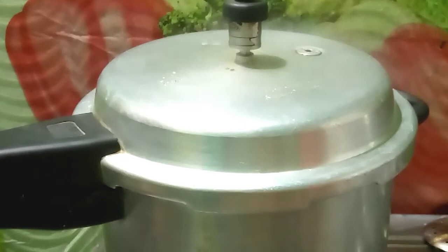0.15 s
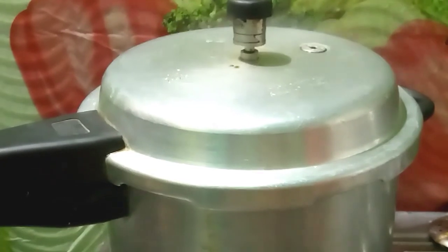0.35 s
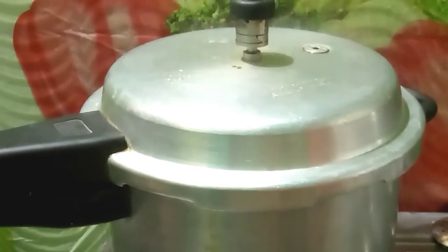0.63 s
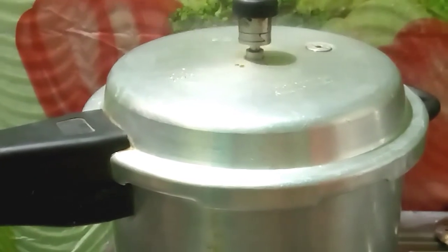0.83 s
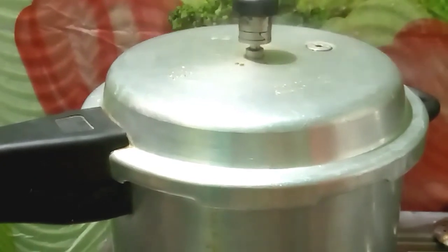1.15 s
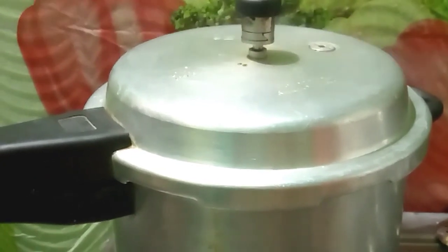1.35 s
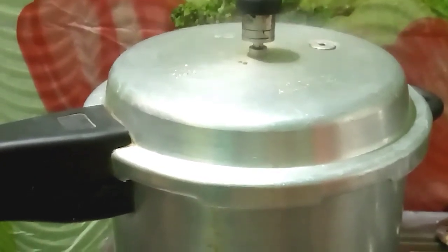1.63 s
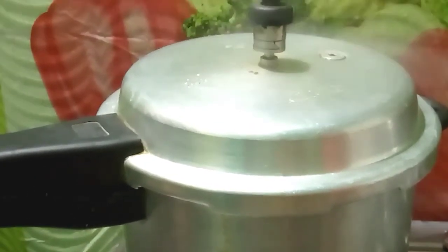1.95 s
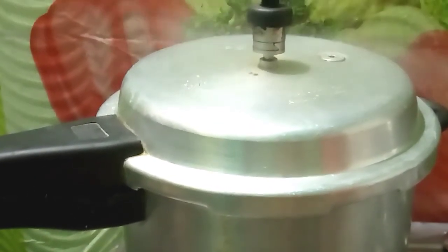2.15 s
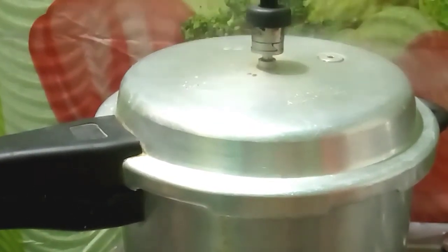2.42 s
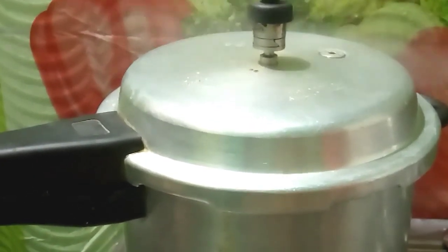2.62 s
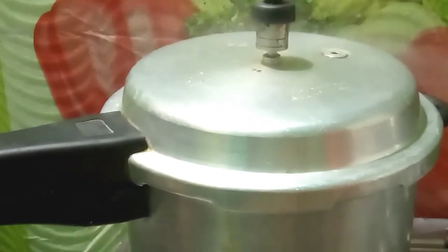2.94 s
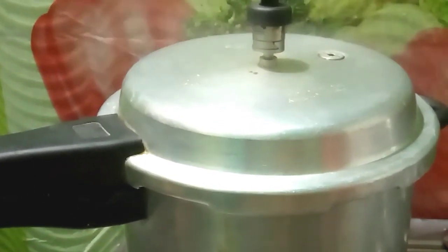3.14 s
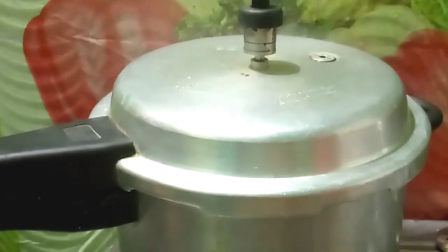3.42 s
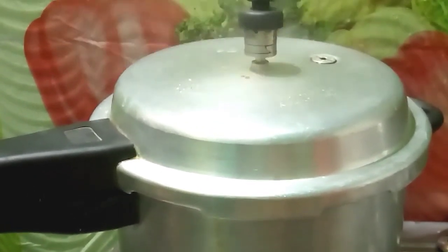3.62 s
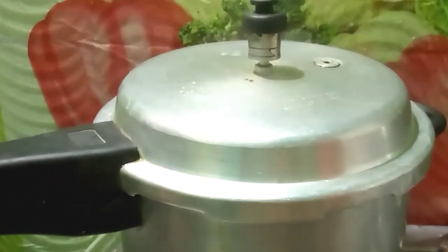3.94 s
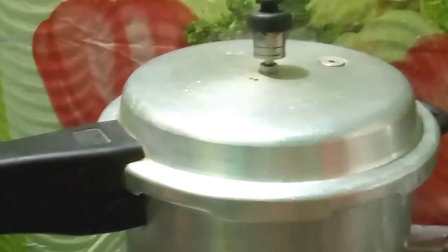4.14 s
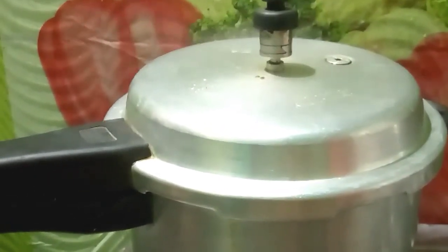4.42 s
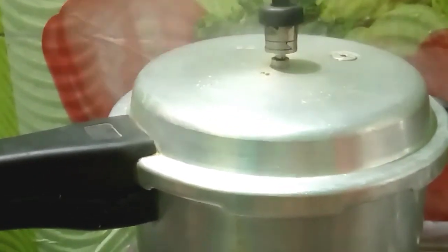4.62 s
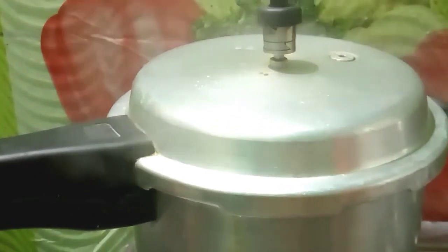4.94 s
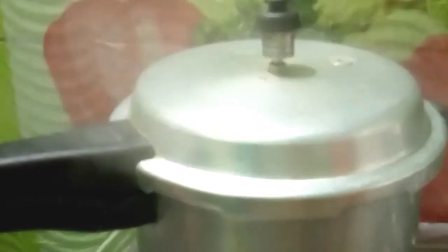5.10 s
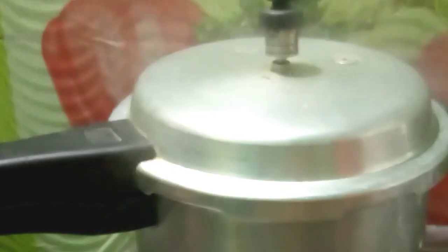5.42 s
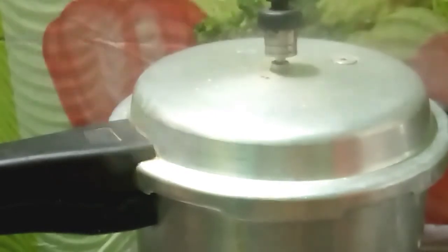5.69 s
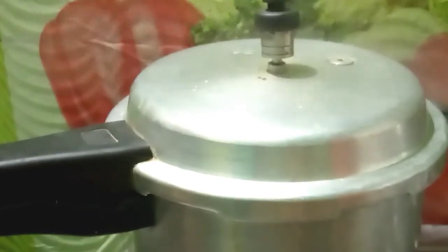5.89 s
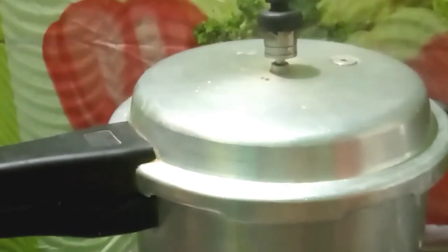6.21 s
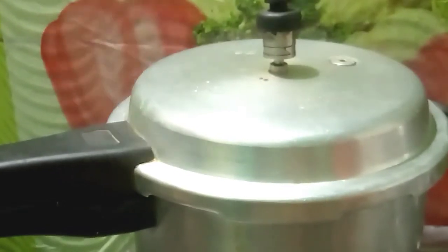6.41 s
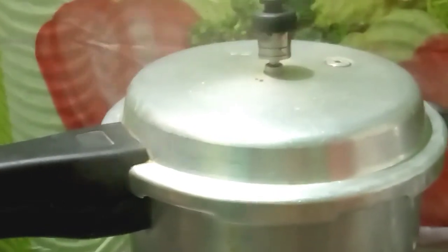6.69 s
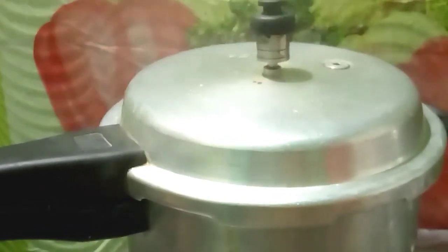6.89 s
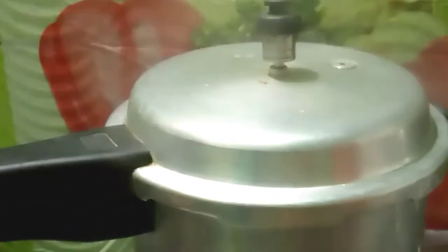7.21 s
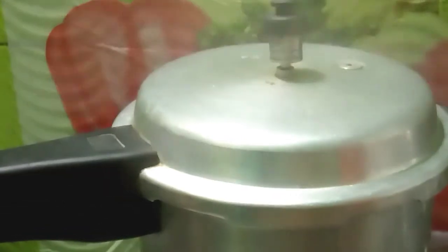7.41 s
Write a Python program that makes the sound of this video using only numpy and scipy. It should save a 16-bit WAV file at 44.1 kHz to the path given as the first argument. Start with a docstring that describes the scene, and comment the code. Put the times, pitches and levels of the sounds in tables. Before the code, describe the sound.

A metal pressure cooker vents steam past its weight valve in a kitchen, heard close. The loud, dense, bright hiss is already at full force at the start. Before one second it cuts to silence for about a tenth of a second, then returns abruptly. It holds steady with tiny flutters, its colour shifting slightly, then fades evenly over the last moments. Same sound in both channels, nothing else heard.

```python
"""A broad hiss close by: a pressure cooker vents steam past its weight valve in a kitchen.
Jet turbulence is shaped noise, coloured by the modes of the short vent pipe and combed by lid and walls.
The level flutters; the colour starts fresh, settles, and drifts over some seconds.
The sound drops out for about a tenth of a second early on and fades at the end."""
import sys
import numpy as np
from scipy import signal
from scipy.fft import rfft, irfft
from scipy.io import wavfile
from scipy.ndimage import uniform_filter1d

SR = 44100
rng = np.random.default_rng(int(sys.argv[2]) if len(sys.argv) > 2 else 0)


def digitize_waveform(pressure):
    """Quantize a signal to 16-bit integers and store it at the path in sys.argv[1].

    Rows of a 2-D input are taken as channels; values are limited to [-1, 1].
    """
    field = np.atleast_2d(pressure).T
    bounded = np.clip(field, -1, 1)
    quanta = np.round(bounded * 32767).astype(np.int16)
    wavfile.write(sys.argv[1], SR, quanta)


def makeup_ratio(level_db):
    """Linear amplitude ratio for a level in decibels (20 dB per factor of ten)."""
    decades = np.asarray(level_db, float) / 20
    return 10 ** decades


N = 332936

# jet turbulence spectrum once settled: (frequency [Hz], relative density [dB])
TURBULENCE = [(25, -32.5), (150, -30.5), (600, -29), (1500, -29.5), (2200, -25), (4700, -35), (5200, -13.5),
              (7900, -24), (9000, -21.5), (12000, -23.5), (13800, -26), (15700, -25)]
# vent pipe modes once settled: (centre [Hz], width scale [Hz], early peak [dB], late peak [dB])
PIPE_MODES = [(3558, 1495, -13, -14.6), (6620, 776, -3.5, -6), (10830, 600, -22.0, -25),
              (14790, 500, -22.5, -28.5)]
# peaks and dips from close reflections: (centre [Hz], width of two sigma [Hz], early gain [dB], late gain [dB])
REFLECTIONS = [(1143, 93, 3.5, 4), (1820, 80, -3, -2), (2416, 90, 2.2, 3.5), (2820, 156, 3.5, 3.5),
               (3190, 120, 1.8, -3), (3360, 220, 3, 0.6), (3580, 150, 2, -0.3), (3810, 50, 3.5, 2.5),
               (3946, 175, -2.5, -5), (4100, 80, 2.5, 1.1), (4330, 210, -1, -3), (5110, 190, -3.8, -3),
               (5280, 250, -1.5, -0.5), (5610, 60, -0.5, 3.6), (5910, 220, 0.6, 2.8), (6220, 140, 0.5, 5),
               (6480, 99, -4.5, -1.2), (6640, 122, 2.5, 4.5), (6810, 63, -3, -2.6), (6830, 220, -1.5, 1.9),
               (7050, 100, 2, -0.5), (7180, 130, 1.2, 4.5), (7460, 73, 3, 1.5), (7420, 70, -4, 1),
               (7700, 180, 2, 3), (7900, 200, -1, 0), (10130, 180, 2, 3.4), (10470, 150, 1, 3),
               (11700, 400, -1, -2), (12250, 400, 2, 0), (12750, 300, -1, 2), (13530, 110, -1, -0.5),
               (14510, 220, 1, 2.6)]

DRIFT_START_S, DRIFT_END_S = 1.4, 5.3  # colour moves from early to late
DROPOUT_START_S, DROPOUT_END_S = .7302, .8463
FADE_START_S, FADE_END_S = 6.06, 7.75
JET_DB = -14.0  # rms before flutter and squashing
SETTLE_MID_S, SETTLE_SCALE_S = 1.8, .3  # logistic fall of freshness
FRESH_RISE, FRESH_NARROWING = 0.049, 0.11  # lowest pipe mode, as shares of its centre and width
FRESH_TOP_DB = 3.5  # extra on the top pipe mode
FRESH_RUSH_DB, RUSH_HZ = 3, 800  # extra low rush and its corner
HOP, SIZE = 1024, 4096  # samples per spectrum step and window
EDGE_HZ = 15730  # top of the passband


def freshness(t_s):
    """The new jet settles: 1 while fresh, 0 once settled."""
    return 1 / (1 + np.exp((t_s - SETTLE_MID_S) / SETTLE_SCALE_S))


def turbulence_power(t_s, hz):
    """Broadband jet noise power, with a stronger low rush while fresh."""
    table_hz, table_db = np.transpose(TURBULENCE)
    settled_db = np.interp(np.log(hz + 1), np.log(table_hz), table_db)
    low = 1 / (1 + (hz / RUSH_HZ) ** 2)
    rush_db = FRESH_RUSH_DB * np.outer(low, freshness(t_s))
    return makeup_ratio(2 * (settled_db[:, None] + rush_db))


def pipe_power(t_s, hz, late):
    """Vent pipe resonances add power; fresh, the lowest is higher and narrower, the top one louder."""
    fresh = freshness(t_s)
    extra_db = [0, 0, 0, FRESH_TOP_DB * fresh]
    glides = [1 + FRESH_RISE * fresh, 1, 1, 1]
    spans = [1 - FRESH_NARROWING * fresh, 1, 1, 1]
    power = 0
    for (mode_hz, width_hz, early_db, late_db), extra, glide, span in zip(PIPE_MODES, extra_db, glides, spans):
        offset = (hz[:, None] - mode_hz * glide) / (width_hz * span)
        peak_db = early_db + (late_db - early_db) * late + extra
        power = power + (1 + offset ** 2) ** -2.5 * makeup_ratio(2 * peak_db)
    return power


def reflection_comb_db(hz, late):
    """Close reflections raise and lower narrow bands, drifting from early to late gains."""
    comb_db = 0
    for centre_hz, width_hz, early_db, late_db in REFLECTIONS:
        bump = np.exp(-.5 * (2 * (hz - centre_hz) / width_hz) ** 2)
        comb_db = comb_db + np.outer(bump, early_db + (late_db - early_db) * late)
    return comb_db


def colour_db(t_s, hz):
    """Turbulence and pipe powers add; the reflections then filter their sum."""
    late = np.clip((t_s - DRIFT_START_S) / (DRIFT_END_S - DRIFT_START_S), 0, 1)
    power = turbulence_power(t_s, hz) + pipe_power(t_s, hz, late)
    return 10 * np.log10(power) + reflection_comb_db(hz, late)


def evened(x):
    """Scales to rms 1."""
    return x / np.sqrt(np.mean(x ** 2) + 1e-20)


def smoothed(grain, bins, frames):
    """Random texture averaged over frequency bins, then time frames; rms 1."""
    over_hz = uniform_filter1d(grain, size=bins, axis=0)
    return evened(uniform_filter1d(over_hz, size=frames, axis=1))


def wander(fastest_hz, slowest_hz):
    """Random drift as noise between two soft corner rates, rms 1."""
    hz = np.fft.rfftfreq(N, 1 / SR)
    band = hz / (hz + slowest_hz) / (1 + (hz / fastest_hz) ** 2)
    return evened(irfft(rfft(rng.standard_normal(N)) * band, N))


def flutter_db():
    """The weight dances on the vent: fast and slow random level changes."""
    return 0.36 * wander(150, 15) + 0.42 * wander(12, 1.9)


def steam():
    """Jet hiss: random complex spectra in the jet's colour, overlap-added, then fluttered."""
    t_s = np.arange(N // HOP + 5) * HOP / SR
    hz = np.fft.rfftfreq(SIZE, 1 / SR)
    real, imag, patch_grain, echo_grain = rng.standard_normal((len(t_s), len(hz), 4)).T
    patches_db = .6 * smoothed(patch_grain, 60, 4)
    # dense room echoes: fine in frequency, slow in time, weak in the bass
    echoes_db = 1.8 * smoothed(echo_grain, 3, 80) * (hz / (hz + 400))[:, None]
    field = makeup_ratio(colour_db(t_s, hz) + patches_db + echoes_db)
    spectra = (real + 1j * imag) * field
    hiss = signal.istft(spectra, nperseg=SIZE, noverlap=SIZE - HOP)[1][:N]
    return evened(hiss) * makeup_ratio(JET_DB + flutter_db())


def scene():
    """One microphone feeds both channels."""
    return np.tile(steam(), (2, 1))


def low_pass(x):
    """Removes everything above the highest recorded frequency."""
    return signal.sosfilt(signal.butter(12, 15920, fs=SR, output="sos"), x)


def record(dry):
    """Softly squashes peaks, cuts the dropout, fades linearly to zero and limits the band."""
    t_s = np.arange(N) / SR
    squashed = 1.596 * np.tanh(dry / 1.604)
    audible = (t_s < DROPOUT_START_S) | (t_s > DROPOUT_END_S)
    fade = np.interp(t_s, (FADE_START_S, FADE_END_S), (1, 0))
    lowpass = signal.firwin(1023, EDGE_HZ, window=("kaiser", 8), fs=SR)
    mix = signal.oaconvolve(squashed * audible * fade, lowpass[None], "same")
    return low_pass(mix)


dry = scene()
out = record(dry)
digitize_waveform(out)
```